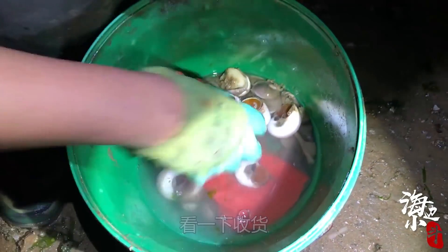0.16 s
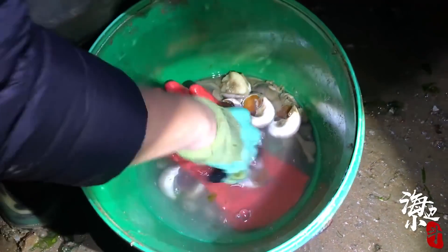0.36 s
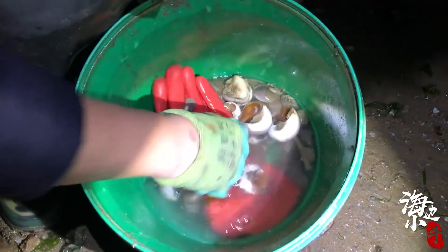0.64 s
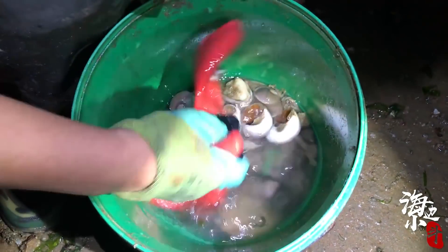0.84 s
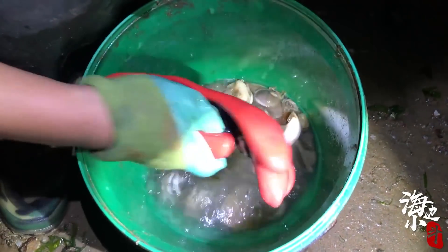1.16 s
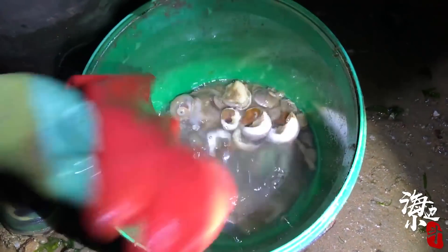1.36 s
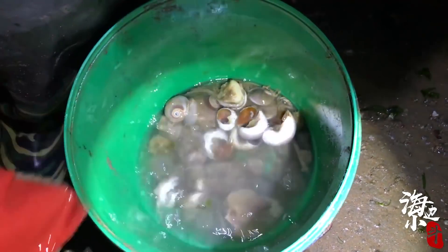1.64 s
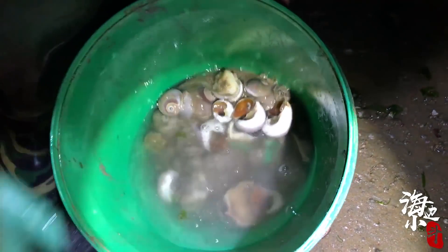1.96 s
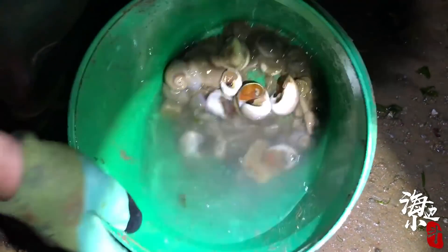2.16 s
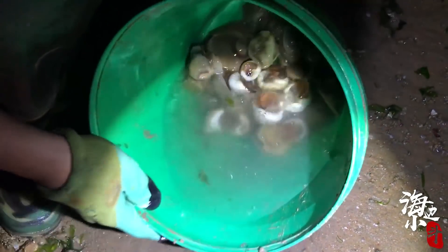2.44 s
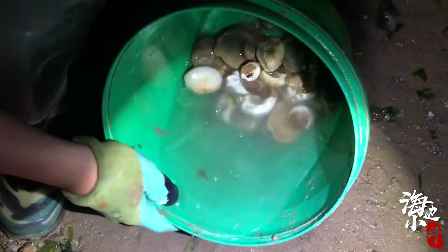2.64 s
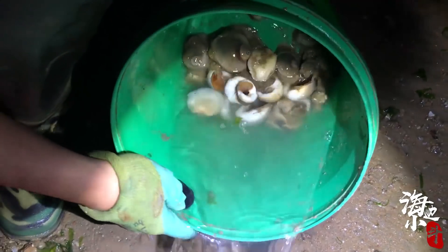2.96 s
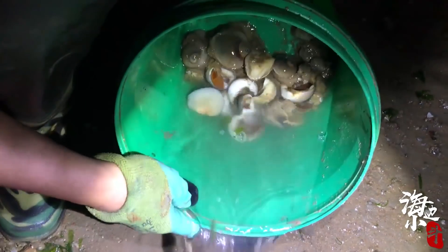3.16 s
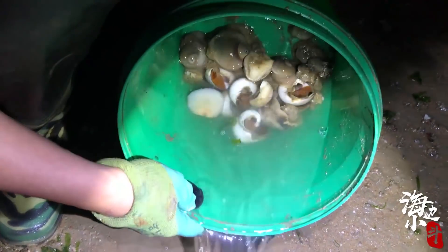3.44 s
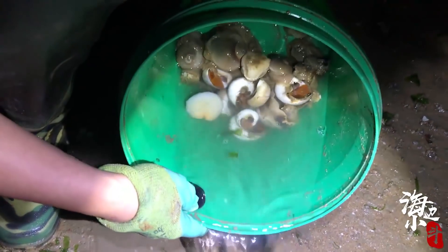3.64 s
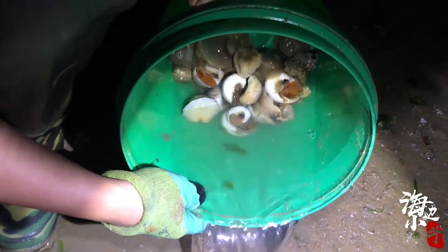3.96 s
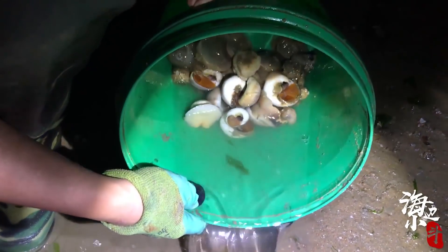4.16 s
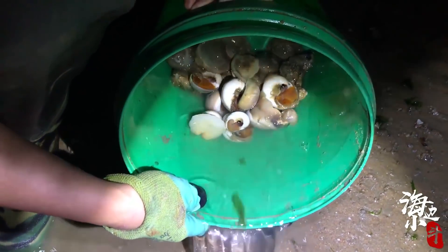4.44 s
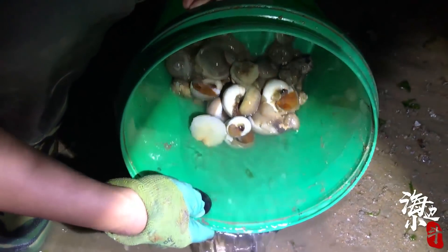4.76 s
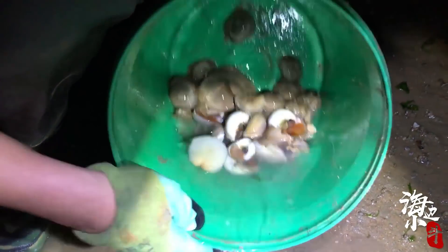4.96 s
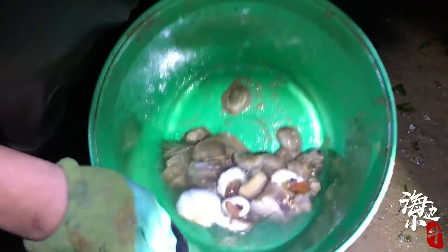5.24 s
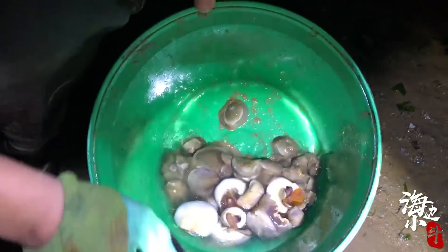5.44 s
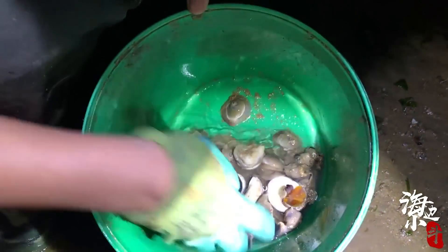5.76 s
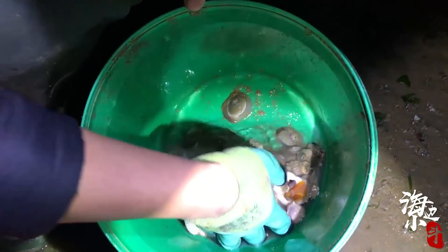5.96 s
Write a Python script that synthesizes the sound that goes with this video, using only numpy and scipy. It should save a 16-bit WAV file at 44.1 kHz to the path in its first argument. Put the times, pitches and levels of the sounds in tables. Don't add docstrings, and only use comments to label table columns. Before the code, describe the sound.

Close outdoor sound of a hand plunging into a plastic bucket of water and shells, with gulping plops and sloshing. After a dripping lull, a sharp splash leads into water pouring over the rim, thinning to bubbling trickles and ticking drops while shells knock. The bucket swings back with a thump, and shells rattle as the hand digs in. Wind thuds low on the microphone.

```python
import sys
import numpy as np
from scipy import signal
from scipy.fft import rfft, irfft
from scipy.io import wavfile
from scipy.ndimage import uniform_filter1d

SR = 44100
rng = np.random.default_rng(int(sys.argv[2]) if len(sys.argv) > 2 else 0)


def invert_db(level):
    return 10 ** (np.asarray(level, dtype=float) / 20)


def put_to_file(sound):
    columns = np.atleast_2d(sound).T
    safe = np.clip(columns, -1, 1)
    whole_steps = np.round(safe * 32767)
    wavfile.write(sys.argv[1], SR, whole_steps.astype(np.int16))


N = 268833

# peak in seconds, slosh in dB, rise in seconds, fall in seconds, brightness in dB.
STIRS = [(.03, -40, 0.17, 0.013, -1), (.365, -38.5, 0.044, 0.17, -3.5), (.5, -49, 0.084, 0.18, 2),
         (.6, -54.5, .1, 0.23, -8), (.76, -42, 0.51, 0.36, -7), (.84, -37.5, 0.21, 0.12, 1),
         (.93, -50.5, 0.2, 0.065, 16.5), (.972, -40.5, 0.29, 0.0099, 5.5), (1.03, -44.5, 0.028, 0.26, 1),
         (1.13, -40.5, 0.13, 0.05, -1.5), (1.45, -52.5, 1, .3, 0.5), (1.55, -47, 0.12, 0.27, -7),
         (1.9, -60, 0.97, 0.25, 0), (1.979, -30.5, 0.007, 0.019, -2), (5.445, -30.5, 0.014, 0.062, -6.5),
         (5.55, -45.5, 0.3, 0.96, -11.5), (5.89, -39, 0.011, 0.25, -7.5), (5.99, -32.5, 0.044, 0.33, -16),
         (6.065, -28.5, 0.15, 0.15, -26)]
# peak in seconds, slosh in dB, rise in seconds, fall in seconds, brightness in dB.
POURS = [(2.1, -42.5, 0.45, 0.19, -8), (2.2, -34.5, 0.29, 0.067, -12), (2.4, -38, 0.5, 0.22, -9),
         (2.53, -39, 0.59, 0.75, -9.5), (2.725, -35, 0.31, 0.019, -11.5), (2.84, -42.5, 0.2, 0.12, -7),
         (3.06, -46.5, 0.13, 0.73, 1.5), (3.28, -51.5, 0.41, 0.3, 4.5), (3.4, -48, 0.28, 0.96, 3.5),
         (3.496, -51, 0.21, 0.76, 5.5), (3.62, -58.5, 0.36, 0.28, 12.5), (3.83, -53, 0.7, 0.25, 5.5),
         (3.95, -49, 0.63, 0.84, 0), (4.1, -45.5, 0.72, 0.18, -2.5), (4.279, -41.5, 0.3, 0.61, -3),
         (4.45, -54, .3, 1, -5), (4.6, -50.5, 0.96, 0.5, 1), (4.8, -50, 1, 1, 1),
         (5.1, -47, 0.11, 0.12, 2.5), (5.3, -46.5, 0.37, 0.24, -14)]
# time in seconds, broken share 0 to 1, hum in dB.
FLOW = [(0, 0.35, -83), (.32, 0, -63), (.36, 0.84, -45), (.5, 0.4, -58.5), (.97, 0.07, -55),
        (1.0, 0.62, -56), (2.1, 0.63, -70), (2.3, 0.3, -57), (2.75, 0.98, -50), (3.0, 0.71, -59.5),
        (5.1, 0.84, -88), (5.25, 0.6, -60), (6.0, 0.45, -76)]
# frequency in Hz, density in dB per Hz.
SLOSH_COLOUR = [(250, -17), (520, -7), (880, -1.5), (1200, -0.5), (1600, 1), (2000, -6.5), (2600, -12),
                (3500, -11)]
# frequency in Hz, density in dB per Hz.
SPLASH_COLOUR = [(1800, 1.5), (2600, 0), (3800, 0), (4800, -3), (6300, -2), (7500, -10), (9000, -69)]
# frequency in Hz, density in dB per Hz.
SPRAY_COLOUR = [(5500, -4), (7200, -9), (9300, -6), (10500, -12.5), (12000, -5.5), (15500, -6),
                (15900, -30)]
# frequency in Hz, density in dB per Hz.
HUM_COLOUR = [(180, -50), (260, -2.5), (320, 2.5), (430, -10.5), (600, -5.5)]
# start in seconds, length in seconds, level in dB, pitch in Hz.
POCKETS = [(0.337, 0.26, -48, 860), (1.186, 0.096, -51, 1364), (1.247, .05, -52.5, 3140),
           (1.313, 0.085, -53.5, 3630), (1.397, 0.13, -55, 3520), (1.359, .05, -54, 610),
           (1.639, 0.054, -50, 920), (1.879, 0.057, -53, 607), (2.3, .1, -46, 1430), (2.455, .12, -46, 296),
           (2.699, 0.042, -44.5, 1830), (2.51, .03, -42.5, 2990), (2.514, .03, -37, 2280),
           (2.252, 0.022, -44, 3120), (2.586, 0.033, -50, 1850), (3.589, 0.1, -55, 2350),
           (3.854, 0.052, -52, 1550), (4.199, 0.082, -54, 706), (4.31, 0.062, -41.5, 1127),
           (5.242, 0.2, -54, 2470), (5.458, 0.028, -43, 1780)]
# start in seconds, peak in dB, pitch in Hz.
PLOPS = [(.354, -35, 1310), (.414, -28, 1330), (.475, -30.5, 1380), (.557, -31, 1535), (.773, -30, 1530),
         (.881, -25, 1880), (.923, -21, 1297), (1.04, -28.5, 688), (1.07, -30, 1310), (1.112, -30, 794),
         (1.385, -41, 1020), (2.008, -27, 1020), (2.21, -24.5, 850), (2.168, -29, 1540), (2.592, -27, 1730),
         (2.689, -21, 1570), (3.024, -39, 2180), (3.053, -26.5, 1200), (3.379, -31, 2210),
         (3.463, -31, 1064), (3.565, -33.5, 2260), (3.601, -31.5, 2070), (3.865, -26.5, 1205),
         (4.04, -32.5, 1765), (5.06, -33, 1330), (5.441, -20.5, 990), (5.943, -39, 500), (5.972, -22, 865),
         (6.04, -35, 1790)]
# start in seconds, peak in dB, pitch in Hz.
TRICKLES = [(0.366, -24, 1430), (0.4504, -39, 1560), (0.4853, -28, 1390), (0.734, -27, 1310),
            (1.02, -28, 1634), (1.0947, -28, 1290), (1.1937, -34, 990), (1.517, -38, 930),
            (2.0017, -30, 970), (2.0647, -24, 1280), (2.1161, -32, 1420), (2.4247, -26.5, 1030),
            (2.528, -28, 1110), (2.806, -29, 1080), (3.1587, -36, 1060), (3.2984, -31, 1050),
            (3.4643, -42, 1110), (3.5379, -32, 2720), (3.6074, -40, 2350), (3.6476, -35, 1680),
            (3.717, -30, 1430), (3.8744, -22, 1690), (3.9716, -28.5, 2240), (4.0991, -31, 2010),
            (4.1127, -31, 1210), (4.1514, -32, 1270), (4.2113, -32, 2120), (4.2544, -24, 1540),
            (4.269, -26, 1220), (4.2897, -27, 1550), (4.423, -32, 1600), (4.5286, -29, 3260),
            (4.566, -27.5, 2430), (4.7471, -37, 2190), (4.7935, -34, 2600), (4.956, -35, 1380),
            (5.0604, -41, 1177), (5.1013, -29, 1230)]
# start in seconds, peak in dB, pitch in Hz.
KNOCKS = [(.379, -23.5, 1390), (1.547, -34, 1240), (1.979, -20, 1210), (2.236, -43, 850), (2.26, -23, 1220),
          (2.481, -20.5, 1760), (2.647, -24, 844), (2.751, -31.5, 825), (2.8905, -21, 1280),
          (3.1076, -20, 2640), (3.1302, -22.5, 3670), (3.231, -23, 870), (3.317, -24.5, 820),
          (3.353, -25.5, 1300), (3.49, -23, 2540), (3.817, -30, 1620), (4.178, -31, 1580),
          (4.313, -20, 2910), (4.351, -21.5, 2470), (4.414, -47, 1510), (4.547, -26, 1145),
          (4.639, -26.5, 1070), (4.728, -32, 1110), (5.161, -26, 1330), (5.487, -20, 890),
          (5.624, -29.5, 920), (5.797, -31, 920), (5.89, -19, 940), (6.058, -15.5, 820),
          (6.081, -19.5, 1310)]
# start in seconds, peak in dB, pitch in Hz.
RATTLES = [(5.4347, -33, 1490), (5.4861, -41, 1640), (5.542, -38, 2430), (5.8892, -21.5, 1600),
           (5.9071, -32, 1750), (5.958, -34, 1750), (5.9712, -26, 1680), (5.983, -26, 1680),
           (6.0373, -33, 1480), (6.047, -30, 1770), (6.0573, -17.5, 1750), (6.079, -23, 1820)]
# frequency in Hz, width in Hz, level in dB.
BUCKET_MODES = [(800, 220, -0.5), (1660, 336, 10.5), (3130, 100, -34)]
# start in seconds, peak in dB, pitch in Hz.
DROPS = [(.3765, -30, 3930), (.4846, -32, 3420), (.705, -43, 5000), (.7734, -20.5, 2820),
         (1.044, -23, 3400), (1.2254, -23, 3560), (1.956, -35, 4160), (2.4811, -15, 4530),
         (2.514, -24.5, 2960), (2.6888, -18, 4400), (3.1298, -35, 3750), (3.1595, -31, 3700),
         (3.4335, -23.5, 5750), (3.611, -26.5, 4480), (3.691, -30, 2630), (3.7774, -33, 4010),
         (3.8088, -29.5, 4330), (3.9093, -30, 5020), (4.235, -22.5, 3000), (4.6314, -32.5, 4670),
         (4.9095, -30.5, 3950), (4.9572, -32.5, 4860), (5.0689, -31, 4025), (5.447, -29, 4800),
         (6.058, -35, 3080)]
# start in seconds, peak in dB, pitch in Hz.
TICKS = [(.8809, -31, 6460), (1.0645, -25, 12700), (1.1085, -30, 5740), (1.1832, -19.5, 6130),
         (1.2535, -31, 13600), (1.4421, -31, 6300), (1.6771, -34, 7250), (1.737, -41, 14400),
         (1.9764, -19.5, 9800), (2.0118, -27, 9140), (3.044, -31, 7580), (3.105, -30, 14000),
         (3.2281, -29.5, 6320), (3.683, -31, 6810), (3.849, -23, 6130), (4.0413, -35, 11550),
         (4.0786, -29, 14730), (4.1066, -33, 11600), (4.252, -26, 11000), (4.32, -34, 6270),
         (4.351, -31, 5850), (4.419, -35, 12600), (4.4817, -38, 12100), (4.545, -29, 13500),
         (4.792, -35, 5600), (5.1, -34, 7260), (5.1221, -26.5, 7050)]
# start in seconds, peak in dB, pitch in Hz.
SPECKS = [(0.045, -37, 11800), (0.3616, -36, 6700), (0.4483, -31, 6170), (0.4856, -30, 10200),
          (0.4934, -26, 5950), (0.5184, -39, 5900), (0.532, -28, 6240), (0.9886, -34, 6220),
          (1.1603, -31, 5920), (1.4002, -34, 7670), (1.9405, -36, 13000), (2.5126, -25.5, 8230),
          (2.6645, -33, 5520), (3.025, -33.5, 7600), (3.1345, -31, 11800), (3.1587, -34, 9490),
          (3.3404, -32, 7900), (3.3767, -27.5, 9050), (3.4201, -36, 5500), (3.5164, -29, 8320),
          (3.6262, -33, 12600), (3.6566, -39, 9310), (3.7493, -32, 6950), (3.776, -30, 14400),
          (3.7883, -37, 11600), (3.8072, -29, 14200), (3.8307, -35, 7220), (4.115, -32, 13240),
          (4.2467, -25, 5930), (4.294, -24.5, 11900), (4.3191, -25, 6340), (4.4244, -30, 6300),
          (4.6294, -35, 5940), (4.8746, -34, 8260), (4.9696, -29.5, 11640), (5.0689, -35, 6100),
          (5.1316, -27, 5540)]
# start in seconds, peak in dB, pitch in Hz.
GLINTS = [
    (1.7366, -24, 13600),
    (1.9746, -23, 14000),
    (2.012, -26, 13800),
    (4.0404, -32, 14000),
]
# centre in seconds, peak in dB.
SNAPS = [(.0048, -25.5), (.489, -26), (.7345, -36), (.7741, -25), (1.1132, -31), (1.1956, -37),
         (1.9792, -20.5), (2.0029, -22.5), (2.0119, -26), (2.4822, -21), (2.499, -35), (2.5098, -27),
         (2.6894, -22), (2.7027, -27), (2.8915, -37.5), (3.0571, -27), (3.1303, -19), (3.2999, -35),
         (4.2384, -30), (4.3205, -28), (6.0594, -20), (6.0824, -22)]
# centre in seconds, peak in dB.
CRACKS = [(1.0727, -29), (1.2254, -31), (1.737, -31), (1.9792, -17), (2.0015, -38), (2.012, -20.5),
          (3.1081, -26), (3.2514, -41), (3.3643, -31), (3.3698, -31), (3.5212, -35), (3.6288, -34),
          (3.8084, -31), (3.8228, -35.5), (3.8587, -33), (4.0416, -30), (4.122, -27.5), (4.2622, -31),
          (4.4856, -31), (4.732, -36)]
# peak in seconds, rumble in dB, rise in seconds, fall in seconds, buffeting sharpness in dB.
GUSTS = [(.03, -46, 0.066, .9, -2), (.44, -39, 0.13, 0.82, -17), (1.04, -36.5, 0.29, 0.046, -5),
         (1.21, -35, 0.071, 0.087, -13), (1.36, -31.5, 0.042, 0.054, -3), (1.59, -26.5, 0.096, 0.042, -11),
         (1.72, -44, 0.34, 0.23, -10), (2.07, -36.5, 0.24, 1, -1.5), (2.32, -45, 0.18, .77, -11),
         (3.15, -45, 0.027, 0.95, -0.5), (3.75, -32.5, 0.068, 0.06, -15), (4.07, -42, 0.32, 0.067, 1),
         (4.49, -32.5, 0.31, 0.013, -7.5), (4.65, -35.5, 0.12, 0.028, -3), (4.78, -33.5, 0.069, .55, -11.5),
         (5.09, -43.5, .2, .12, -7), (5.49, -37, 0.14, .1, -14), (5.65, -34, 0.4, 0.22, -8.5),
         (5.97, -25, 0.078, 0.055, 5)]
# start in seconds, peak in dB, swing rate in Hz, number of swings.
PUSHES = [(0.037, -35, 74.4, 4.4), (0.431, -14.5, 126, 3.9), (1.005, -23, 118, 6.7), (1.038, -21, 62, 2.7),
          (1.15, -27.5, 117, 5.5), (1.34, -30, 300, 4.9), (1.346, -24, 71.4, 1.1),
          (1.539, -18.5, 77.4, 1.1), (1.562, -29.5, 214, 5.6), (2.063, -15.5, 83.5, 4.3),
          (2.068, -23, 291, 6.1), (2.087, -19, 83.4, 3.1), (2.176, -27.5, 130, 3.2),
          (2.208, -22.5, 79, 3.6), (2.333, -35, 70.4, 4.3), (3.157, -28.5, 88.5, 2.2),
          (3.758, -25, 61, 3.7), (4.032, -34, 61.9, 2), (3.926, -29.5, 58.6, 4.1), (4.61, -36.5, 278, 6.3),
          (4.468, -22.5, 90.5, 3.1), (4.616, -24.5, 92, 3.1), (4.781, -23, 89, 3.5),
          (4.967, -18.5, 61, 2.5), (5.07, -21, 67, 3.8), (5.167, -27, 104, 4.5), (5.476, -17, 75.5, 1.3),
          (5.603, -18.5, 133, 9.1), (5.92, -15.5, 71.4, 1.6), (5.964, -17.5, 132.4, 5.1)]
# frequency in Hz, density in dB per Hz.
RUMBLE_COLOUR = [(20, -44), (40, -8.5), (65, -0.5), (110, -11), (160, -17), (300, -34)]
# frequency in Hz, density in dB per Hz.
BUFFET_COLOUR = [(60, -27), (120, 2), (200, -2), (330, -7.5), (480, -19.5), (800, -24)]
# frequency in Hz, density in dB per Hz.
NIGHT_COLOUR = [(150, -23), (250, -25), (443, -11.5), (1210, -12), (3030, -20), (3730, -17), (4830, -27),
                (15700, -24)]

SWELL_DB = 15


def evened(x):
    return x / np.sqrt(np.mean(x ** 2) + 1e-20)


def curve(rows, axis):
    rows = np.array(rows)
    return np.interp(np.arange(N) / SR, rows[:, 0], rows[:, axis])


def coloured(x, points):
    f, db = np.transpose(points)
    hz = np.fft.rfftfreq(N, 1 / SR) + 1
    gain_db = np.interp(np.log(hz), np.log(f), db, -70, -70)
    return evened(irfft(rfft(x) * invert_db(gain_db), N))


def lumps(per_s, depth_db):
    width = max(int(SR / per_s), 2)
    wander = uniform_filter1d(rng.standard_normal(N), width)
    wander = uniform_filter1d(wander, width)
    return invert_db(depth_db * evened(wander))


def swells(rows, still_db, share=0, offset_db=0, haste=1):
    t, out = np.arange(N) / SR, np.full(N, float(still_db))
    for s, db, rise, fall, colour_db in rows:
        away = np.maximum(haste * (s - t) / max(rise, .004), (t - s) / max(fall, .004))
        out = np.maximum(out, db + share * colour_db + offset_db - SWELL_DB * away)
    return out


def resonate(x, hz, width):
    hz, width = np.clip([hz, width], 30, .35 * SR)
    return signal.lfilter(*signal.iirpeak(hz, hz / width, SR), x)


def focused(burst, hz, sharp):
    once = resonate(burst, hz, hz / sharp)
    return evened(resonate(once, hz, hz / sharp))


def add(mix, s, sound):
    part = mix[max(round(s * SR), 0):][:len(sound)]
    part += sound[:len(part)]


def water():
    broken = np.clip(curve(FLOW, axis=1), 0, .92)
    surge = lumps(59, 2.3) ** np.sqrt(broken + 0.073)
    out = invert_db(curve(FLOW, axis=2)) * coloured(rng.standard_normal(N), HUM_COLOUR) * surge
    moves = STIRS + POURS
    slosh_db = swells(moves, still_db=-57)
    splash_db = swells(moves, still_db=-61.5, share=1)
    stir_spray_db = swells(STIRS, still_db=-70, share=1.206, offset_db=-4, haste=1.18)
    pour_spray_db = swells(POURS, still_db=-70, share=1.206, offset_db=-4.5)
    spray_db = np.maximum(stir_spray_db, pour_spray_db)

    spatter = bubbles(7000, 16000, 700, 1.8, 2.6)
    slosh = bubbles(600, 2600, 700, 6.0, 3.2)
    splash = bubbles(1900, 7500, 620, 10.0, 3.8) + .3 * spatter
    spray = .6 * bubbles(7000, 15500, 400, 14.0, 4.0) + spatter
    layers = [(SLOSH_COLOUR, slosh_db, slosh),
              (SPLASH_COLOUR, splash_db, splash),
              (SPRAY_COLOUR, spray_db, spray)]
    for points, level_db, grains in layers:
        mix = np.sqrt(broken) * evened(coloured(grains, points))
        mix = mix + np.sqrt(1 - broken) * coloured(rng.standard_normal(N), points)
        out += invert_db(level_db - 2.5) * evened(mix * surge * lumps(145, 1.0))
    return out


def bubbles(lo_hz, hi_hz, per_s, cycles, spread_db, count=24):
    out = np.zeros(N)
    born = rng.random(N) < per_s * lumps(30, 4.0) / SR
    size = invert_db(spread_db * np.minimum(rng.exponential(1, N), 3.2)) * born
    kind = rng.integers(0, count, N)
    for k, hz in enumerate(np.geomspace(lo_hz, hi_hz, count)):
        u = np.arange(int(4 * cycles * SR / hz) + 8) * hz / SR
        grain = np.sin(2 * np.pi * u * (1 + .002 * u)) * np.exp(-u / cycles) * (1 - np.exp(-u / 1.3))
        out += signal.oaconvolve(size * (kind == k), grain)[:N]
    return evened(out)


def patchy(x, depth_db):
    z = signal.stft(x, SR, nperseg=256)[2]
    field = uniform_filter1d(rng.standard_normal(z.T.shape), size=6, axis=0)
    field = evened(uniform_filter1d(field, size=4, axis=1)).T
    gain = invert_db(depth_db * field - depth_db ** 2 * np.log(10) / 20)
    return signal.istft(z * gain, SR, nperseg=256)[1][:N]


def air_pockets(sharp, rise):
    out = np.zeros(N)
    bursts = rng.standard_normal((len(POCKETS), SR // 2))
    for (s, length, db, hz), burst in zip(POCKETS, bursts):
        u = np.linspace(0, 1, int(np.clip(length, .01, .45) * SR))
        low = focused(burst, hz / rise, sharp)[-len(u):]
        high = focused(burst, hz * rise, sharp)[-len(u):]
        add(out, s, invert_db(db) * np.sin(np.pi * u ** 0.76) * (np.sqrt(1 - u) * low + np.sqrt(u) * high))
    return out


def strikes(rows, ms, sharp, tonal, glide, wide_db, body_db, rise_s):
    out = np.zeros(N)
    t = np.arange(2600) / SR
    noise = rng.standard_normal((len(rows), len(t)))
    shape = np.exp(-2300 * t / max(ms, .7)) * (1 - np.exp(-t / rise_s)) ** 2
    for (s, db, hz), burst in zip(rows, noise):
        ring = np.sin(2 * np.pi * hz * t * (1 + glide * t)) * tonal
        near = focused(burst, hz, sharp) * (1 - tonal) * 0.76
        wide = invert_db(wide_db) * resonate(burst, 0.65 * hz, 0.58 * hz) * shape
        body = sum(invert_db(d + body_db) * resonate(burst * shape, f, w) for f, w, d in BUCKET_MODES)
        add(out, s, invert_db(db) * ((ring + near + wide) * shape + body))
    return out


def echoed_hits():
    hits = strikes(PLOPS, ms=22, sharp=3.6, tonal=0.5, glide=5, wide_db=-5, body_db=-5, rise_s=0.0014)
    hits += strikes(KNOCKS, ms=6.94, sharp=1.6, tonal=0.62, glide=5.7,
                    wide_db=-37.5, body_db=-9.0, rise_s=0.00034)
    hits += strikes(DROPS, ms=6.5, sharp=2.6, tonal=0.45, glide=3, wide_db=-12, body_db=-26, rise_s=0.0006)
    hits += strikes(TICKS, ms=7, sharp=2.2, tonal=0.42, glide=2.35, wide_db=-13, body_db=-30, rise_s=0.0006)
    t = np.arange(3000) / SR
    echo = rng.standard_normal(len(t)) * invert_db(-60 * t / 0.14) * (t > .003)
    echo = resonate(echo, 2100, 3300)
    echo = echo / np.linalg.norm(echo)
    return hits + invert_db(-14.5) * signal.oaconvolve(hits, echo)[:N]


def close_hits():
    out = strikes(TRICKLES, ms=9.7, sharp=3.5, tonal=0.34, glide=6.26, wide_db=-11, body_db=-6, rise_s=0.0019)
    out += strikes(RATTLES, ms=8.3, sharp=1.1, tonal=0.69, glide=2.3, wide_db=-16, body_db=-28, rise_s=0.00034)
    out += strikes(SPECKS, ms=3.4, sharp=1.0, tonal=0.28, glide=1.8, wide_db=-7.5, body_db=-34, rise_s=0.00032)
    return out


def glints():
    return strikes(GLINTS, ms=3.5, sharp=3.6, tonal=0.35, glide=1.5, wide_db=-15, body_db=-36, rise_s=0.0003)


def snaps(rows, hz, ms):
    out, t = np.zeros(N), (np.arange(200) - 100) / SR
    for (s, db), (pitch, phase) in zip(rows, rng.random((len(rows), 2))):
        swing = np.cos(2 * np.pi * (hz * (1 + .4 * pitch) * t + phase))
        add(out, s + t[0], invert_db(db) * swing * np.exp(-(t * 1000 / ms) ** 2))
    return out


def wind():
    low = evened(coloured(rng.standard_normal(N), RUMBLE_COLOUR) * lumps(23, 1.6))
    high = evened(coloured(rng.standard_normal(N), BUFFET_COLOUR) * lumps(51, 4.0))
    rumble_db = swells(GUSTS, still_db=-62)
    buffet_db = swells(GUSTS, still_db=-58, share=0.88, offset_db=-5.0)
    out = invert_db(rumble_db) * low + invert_db(buffet_db) * high
    for s, db, hz, swings in PUSHES:
        u = np.linspace(0, 1, int(max(swings, .6) * SR / hz))
        push = np.sin(2 * np.pi * swings * u ** 0.704) * np.sin(np.pi * u ** 0.41) ** 2
        add(out, s, invert_db(db - 4.0) * push)
    return out


def night():
    return invert_db(-60.5) * coloured(rng.standard_normal(N), NIGHT_COLOUR)


def scene():
    mono = patchy(water(), 2.5) + air_pockets(sharp=10.7, rise=1.043)
    mono = mono + echoed_hits() + close_hits()
    mono = mono + wind() + patchy(night(), 2.2)
    mono = signal.oaconvolve(mono, signal.firwin(255, 15900, fs=SR), "same")
    mono = mono + glints()
    mono = mono + snaps(SNAPS, hz=2130, ms=0.17) + snaps(CRACKS, hz=9060, ms=0.097)
    return np.array([mono, mono])


def treble_side(mono):
    hz, t, z = signal.stft(mono, SR, nperseg=512)
    power = abs(z) ** 2
    treble_db = 10 * np.log10(uniform_filter1d(power[60:].mean(0), 5) + 1e-20)
    burst = treble_db - uniform_filter1d(treble_db, 60) > 3.2
    active = burst | (t < 1.013) | (t > 5.207)
    chance = rng.random((len(t) // 6 + 1, len(hz) // 12 + 1)).T
    chance = chance.repeat(12, 0).repeat(6, 1)[:len(hz), :len(t)]
    patches = chance < np.clip(hz[:, None] / 14000, 0, .65)
    band = abs(hz[:, None] - 10000) < 5400
    smooth = np.sqrt(abs(uniform_filter1d(power, 12, 0)))
    phase = np.exp(2j * np.pi * rng.random(z.T.shape).T)
    return invert_db(-2.5) * signal.istft(smooth * phase * active * patches * band, SR, nperseg=512)[1][:N]


def low_pass(x):
    return signal.sosfilt(signal.butter(12, 16810, fs=SR, output="sos"), x)


def record(dry):
    dry = signal.oaconvolve(dry, signal.firwin(255, 16600, fs=SR)[None], "same")
    side = treble_side(dry[0])
    return low_pass(dry + np.array([side, -side]))


dry = scene()
out = record(dry)
put_to_file(out)
```